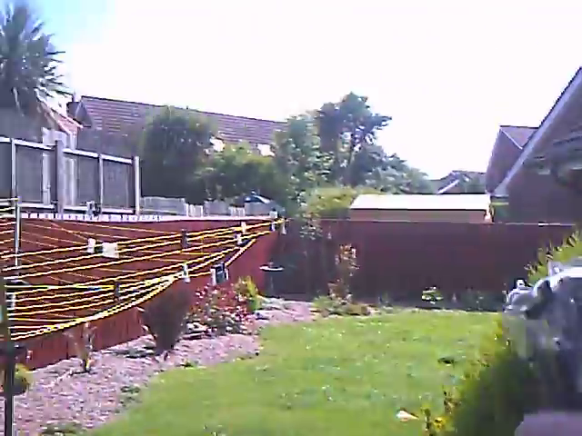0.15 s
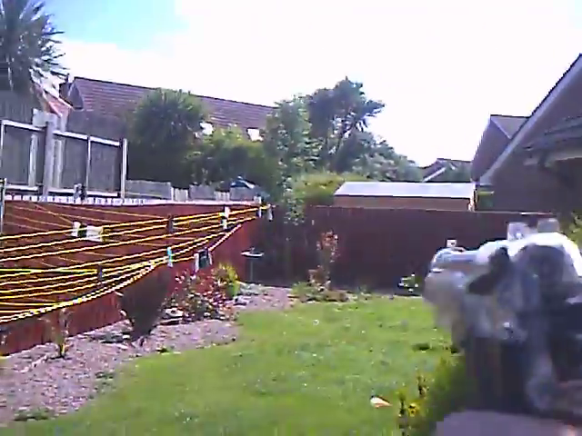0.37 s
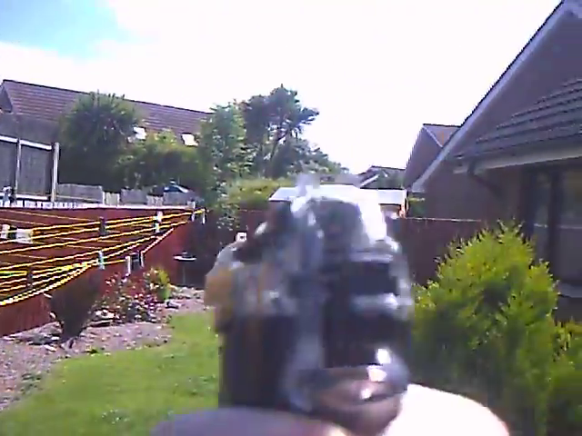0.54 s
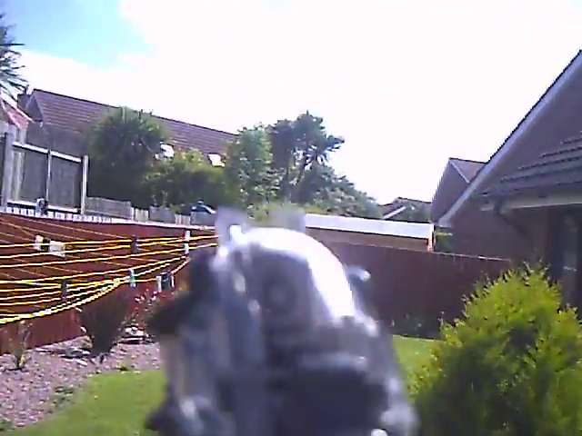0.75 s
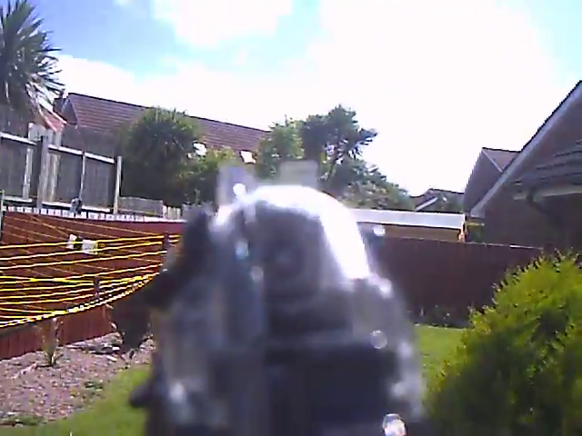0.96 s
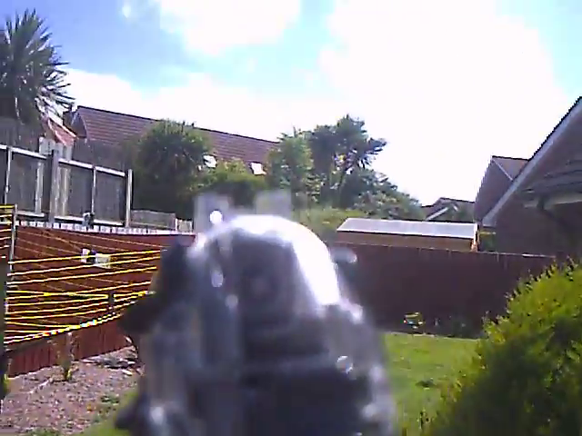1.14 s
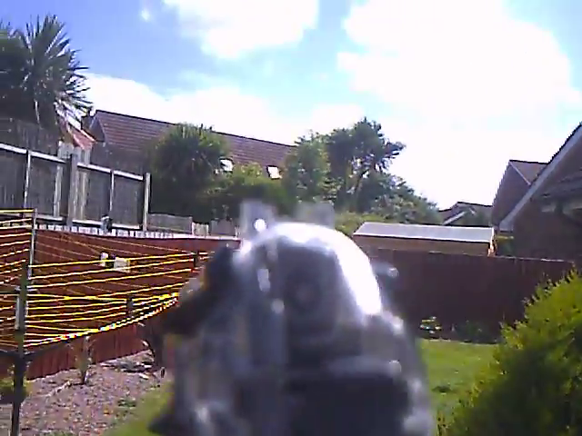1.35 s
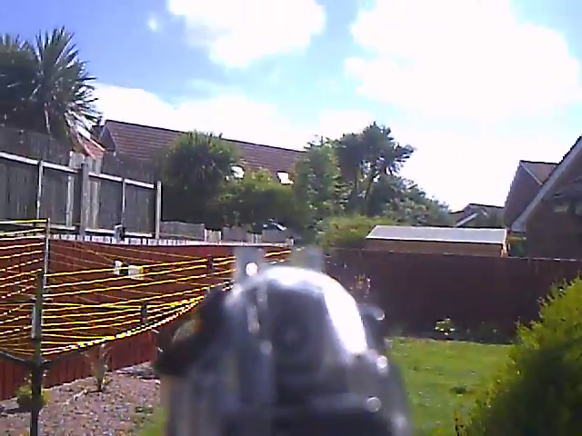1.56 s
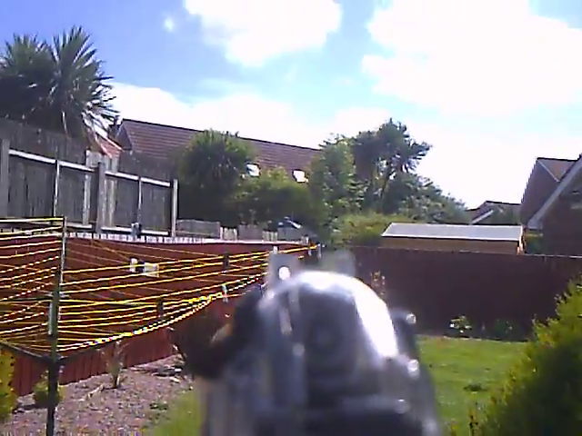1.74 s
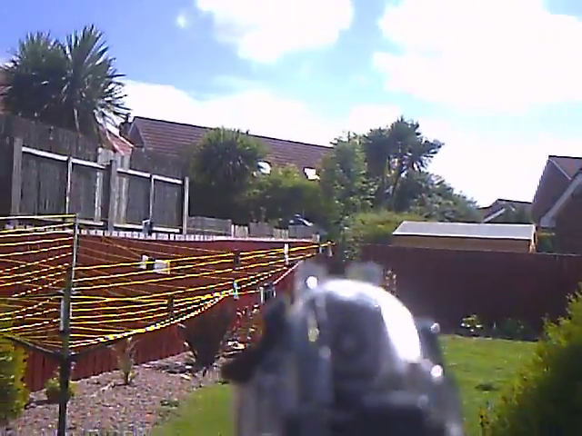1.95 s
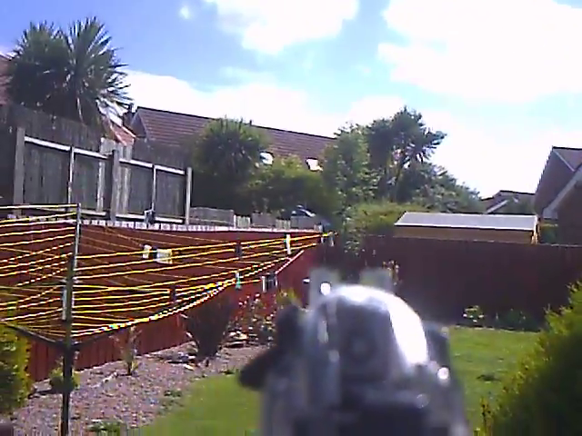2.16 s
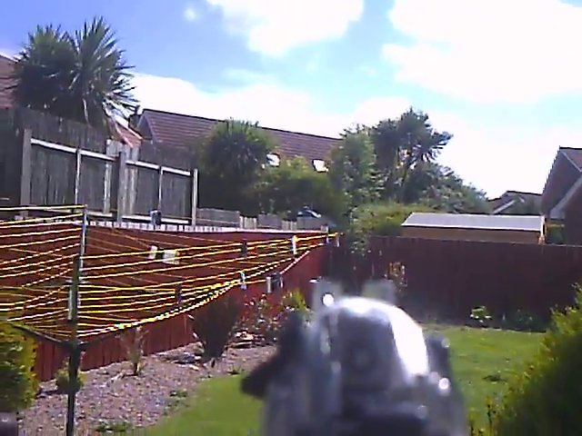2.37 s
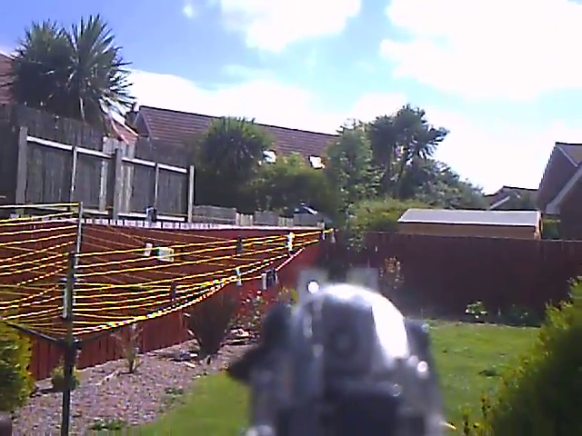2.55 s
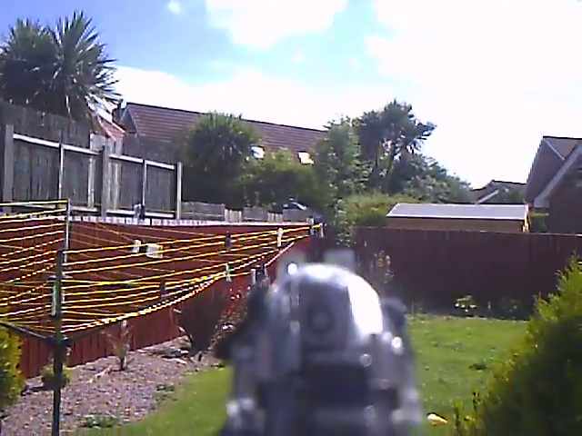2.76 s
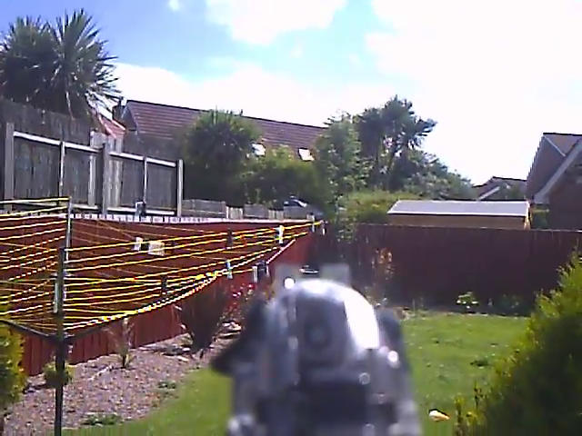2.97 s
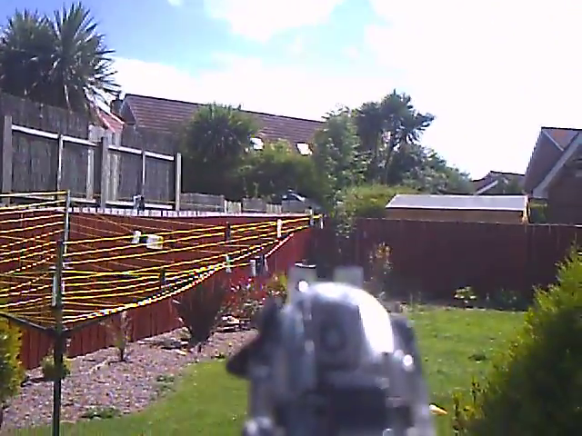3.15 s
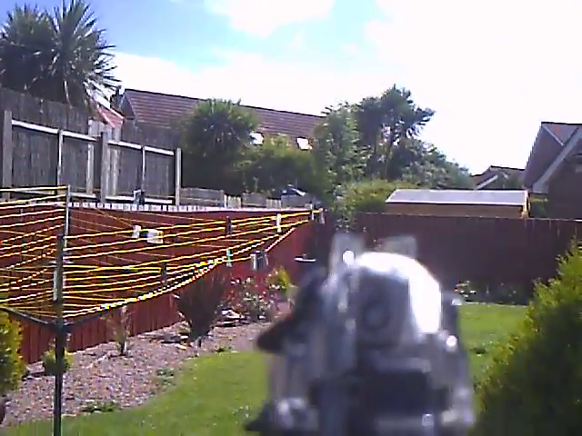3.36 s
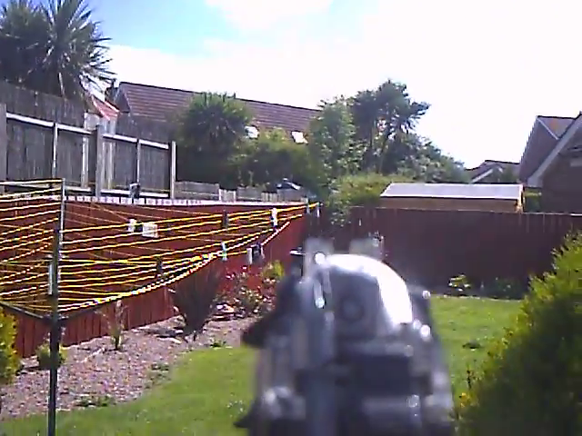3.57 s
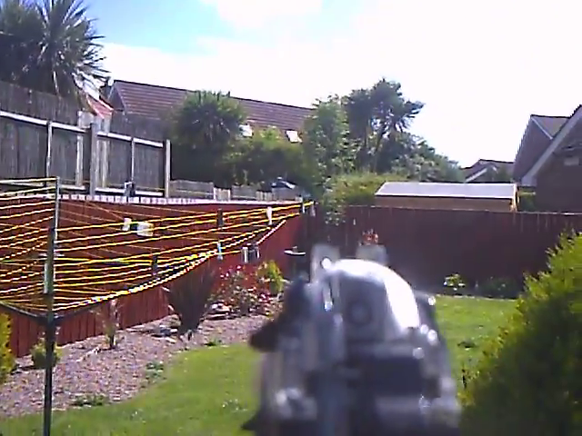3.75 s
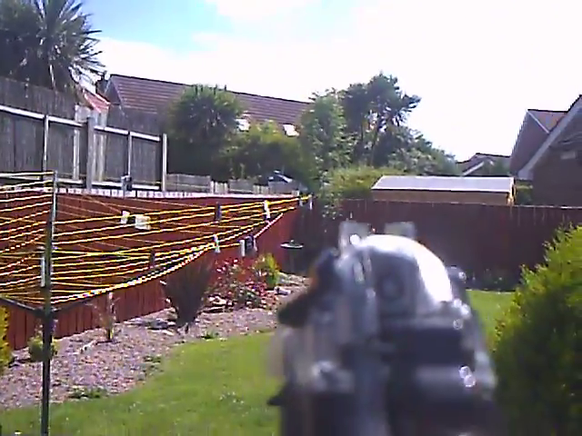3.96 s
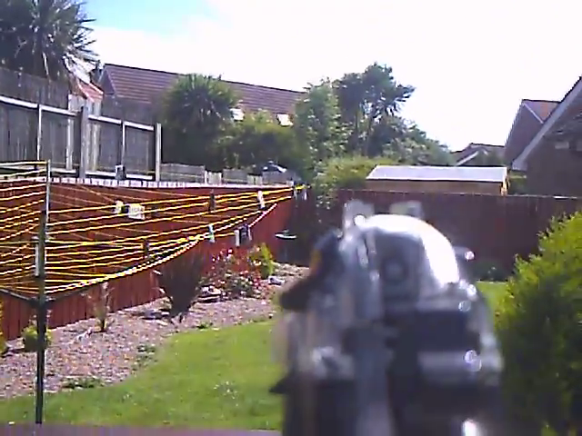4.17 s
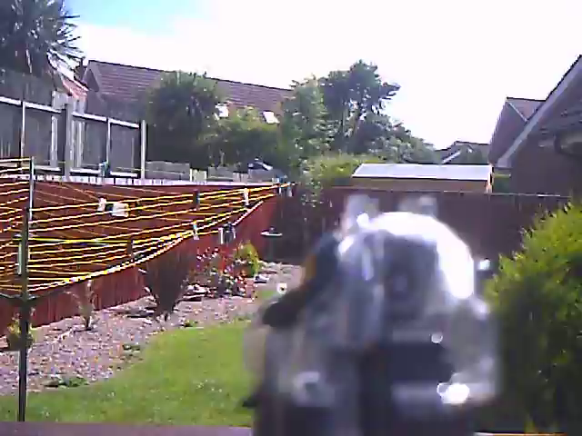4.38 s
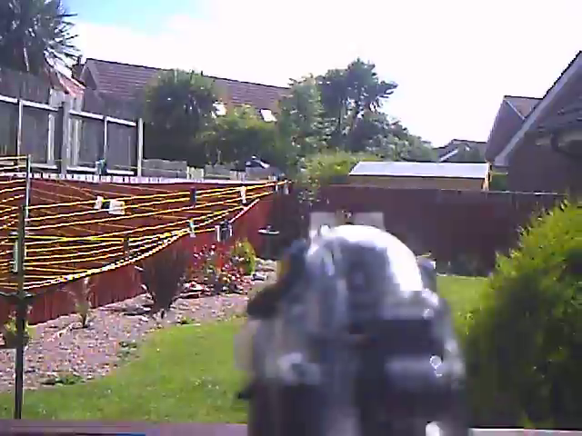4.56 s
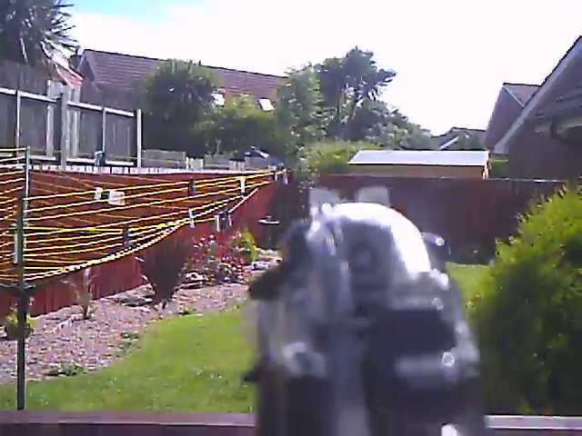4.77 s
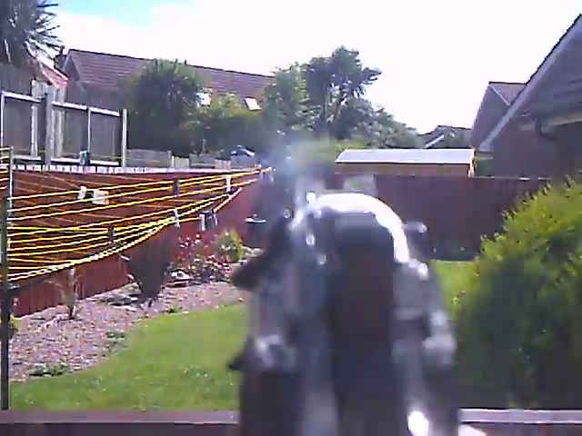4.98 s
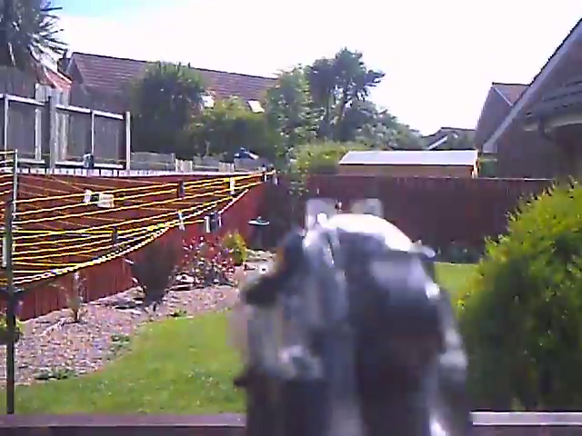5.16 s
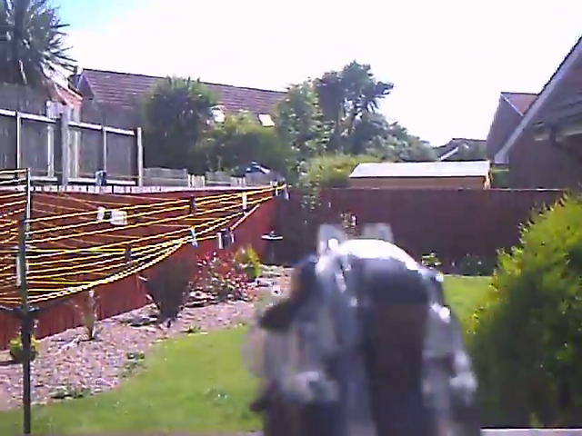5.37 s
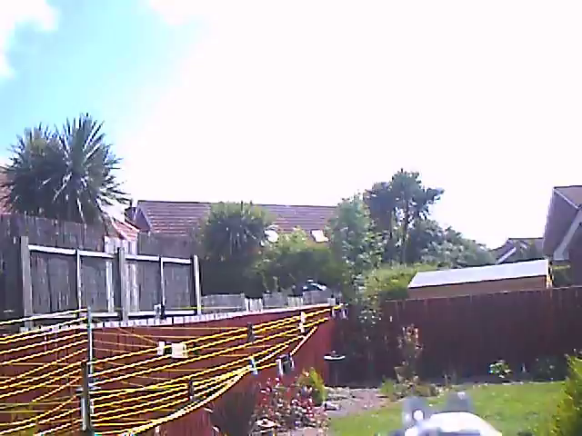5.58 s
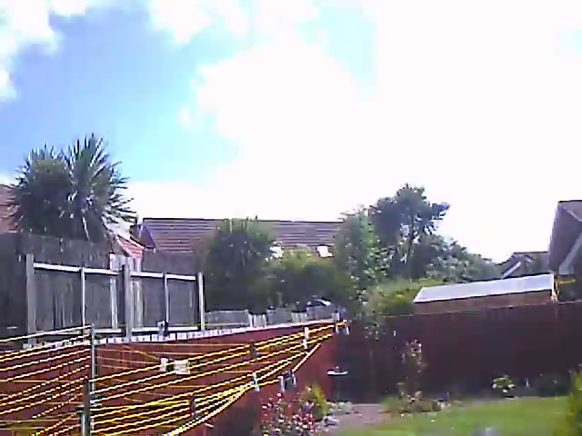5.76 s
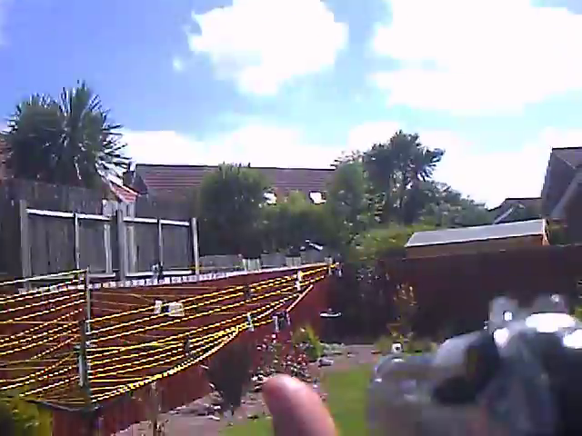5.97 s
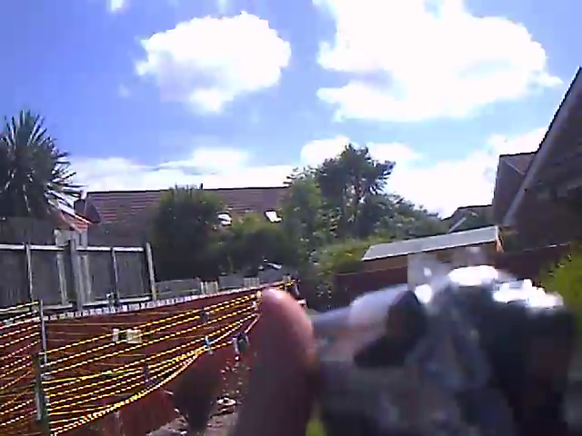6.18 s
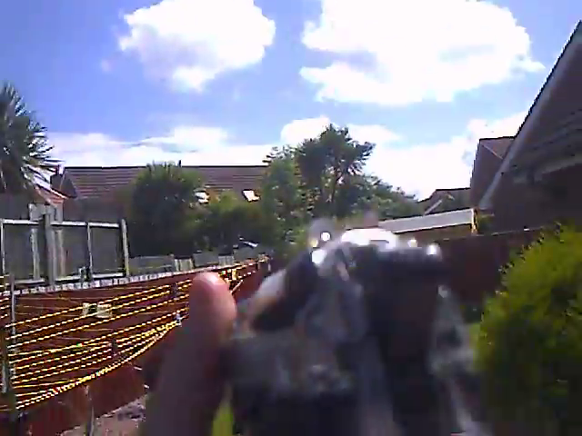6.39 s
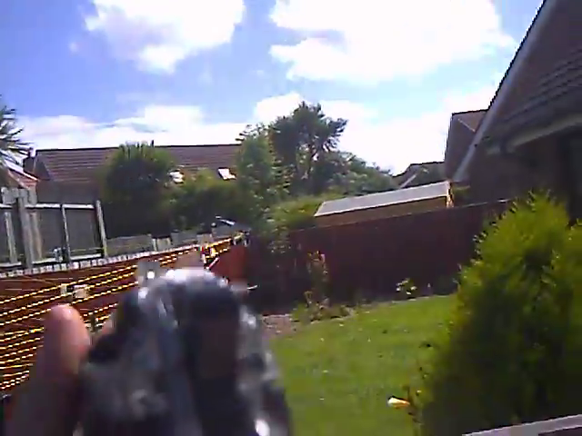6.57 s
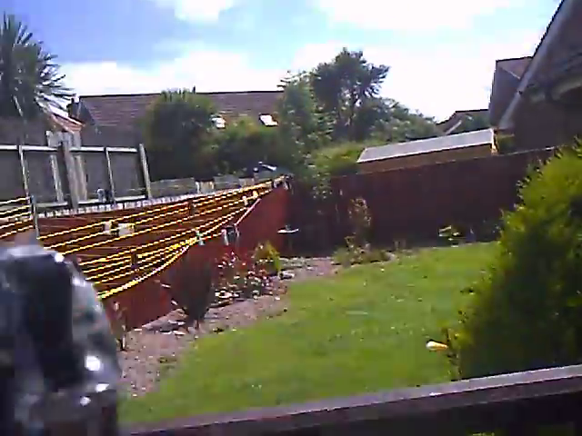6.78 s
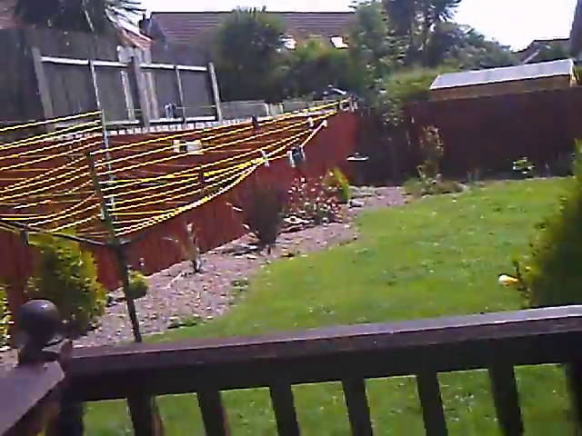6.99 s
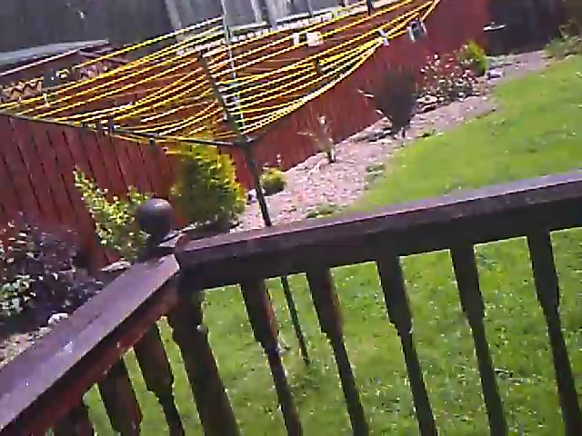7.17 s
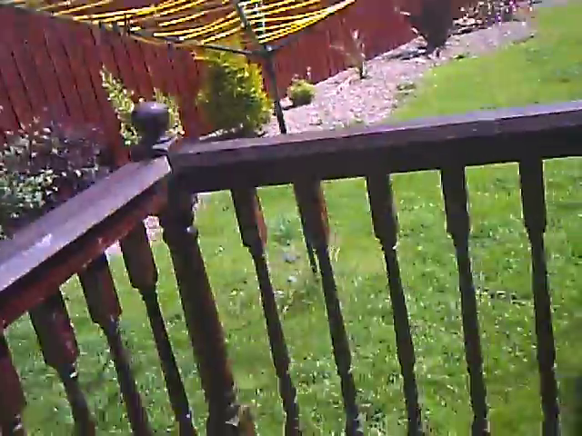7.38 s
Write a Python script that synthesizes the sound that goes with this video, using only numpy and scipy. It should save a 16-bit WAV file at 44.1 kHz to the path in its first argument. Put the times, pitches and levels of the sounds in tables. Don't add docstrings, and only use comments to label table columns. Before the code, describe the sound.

Outdoors in a garden, a small crude camera microphone picks up bumps and creaking of its plastic housing, a pause with barely any faint background, then eight close gas pistol shots. Each one is a distorted puff and thump with the slide ringing back and slamming home. The pace quickens, then slackens as gas runs low. Pellets tap distant boards; knocks and creaks finish.

```python
import sys
import numpy as np
from scipy import signal
from scipy.io import wavfile
from scipy.ndimage import uniform_filter1d

SR = 44100
rng = np.random.default_rng(int(sys.argv[2]) if len(sys.argv) > 2 else 0)


def magnitude_from_level(level_db):
    exponent = np.asarray(level_db, float) / 20
    return 10 ** exponent


def transcribe(u):
    v = np.clip(np.atleast_2d(u).T, -1, 1)
    q = np.round(v * 32767).astype(np.int16)
    wavfile.write(sys.argv[1], SR, q)


N = 327663

# (time [s], level [dB], fade over the blast [dB], vent thump delay [ms], thump level [dB])
BLASTS = [
    (3.3592, 0, 5, 18.5, 0),
    (4.1085, -1, 3, 19.5, 0),
    (4.5105, -3, 4, 17, 1),
    (4.7808, -2, 6, 18.2, 0),
    (5.0265, -2, 8, 19, 1),
    (5.2495, -2, 9, 21, 1),
    (5.7655, -3, 4, 21.5, -8),
    (6.3262, -4, 6, 23, -10),
]
# (time [s], peak [dB], ring [Hz], bounce [dB], clatter share [0-1])
STOPS = [
    (3.3879, -5, 4400, -1, .8),
    (4.137, 2, 4350, -6, .4),
    (4.5358, 2, 4350, -1, .3),
    (4.8078, 2, 4350, -6, .3),
    (5.0553, 2, 4400, -4, .25),
    (5.2803, 2, 4400, -5, .25),
    (5.797, 0, 4550, -8, .4),
    (6.358, -4, 4700, -11, .6),
]
# (time [s], peak [dB], bounce [dB], scrape before it [dB])
SLAMS = [
    (3.4199, -5, -5, -23),
    (4.1672, -3.5, -9, -17),
    (4.571, -4, -7.5, -17),
    (4.841, -3.5, -2, -20),
    (5.084, -8.5, -0.5, -16.5),
    (5.3077, -2, -6, -13),
    (5.82, -4, -8, -11),
    (6.3777, -6, -7, -11.5),
]
# (time [s], level [dB], board [Hz], bright tick [dB])
PELLETS = [(3.53, -28.5, 1010, 5), (4.252, -31.5, 1620, 7.5), (4.608, -34, 1740, 11.5),
           (4.874, -36.5, 1740, 13), (5.329, -56, 1750, 11), (5.361, -40.5, 1580, 20),
           (5.613, -27.5, 916, -3.5), (5.914, -29, 994, 5.5), (5.953, -31, 864, 5), (6.481, -29, 990, 6),
           (6.527, -31, 600, 4)]
# (time [s], level [dB], body [Hz], length [ms])
KNOCKS = [(0.01, -33, 1000, 15), (0.025, -29, 875, 8.8), (0.361, -28, 1200, 9.7), (0.114, -31, 920, 26),
          (0.28, -24.5, 1300, 6.4), (0.322, -35, 1680, 7.6), (0.394, -23.5, 1210, 31),
          (0.41, -21, 1200, 14), (0.419, -26, 1550, 8.3), (0.825, -14.5, 1420, 8.9),
          (0.84, -14.5, 1210, 14), (0.86, -20, 1560, 22), (1.108, -29.5, 886, 21), (3.687, -36, 1040, 4.1),
          (6.021, -28, 1034, 8.9), (6.121, -21.5, 1245, 7.4), (6.139, -31, 1120, 8.8),
          (6.191, -14.5, 1400, 7.1), (6.219, -24, 1220, 8.8), (6.23, -20, 1200, 28),
          (6.247, -19.5, 1290, 14), (6.259, -23, 1250, 12), (6.499, -22, 1130, 3.2),
          (6.674, -21, 1030, 5.3), (6.704, -22.5, 1220, 9.6), (6.833, -27.5, 1280, 15),
          (7.128, -30.5, 602, 19), (7.369, -19.5, 1190, 15), (7.382, -22.5, 1370, 24), (7.424, -27, 980, 8)]
# (time [s], signed pressure peak [full scale])
SLIPS = [(0.1728, -0.16), (0.3078, -0.14), (0.3127, -0.14), (0.3588, -0.06), (0.3921, 0.17), (0.3954, 0.29),
         (0.3995, 0.13), (0.4283, -0.05), (0.4336, -0.47), (0.8345, 0.16), (0.8368, 0.24), (0.8404, -0.15),
         (0.8446, -0.37), (0.849, -0.26), (0.8676, -0.31), (0.8807, -0.17), (5.447, -0.13), (6.1832, 0.27),
         (6.1852, 0.39), (6.1916, 0.12), (6.194, 0.22), (6.196, -0.28), (6.198, -0.18), (6.2068, -0.13),
         (6.2436, -0.27), (6.2559, -0.11), (6.5101, 0.06), (6.6161, -0.22)]
# (start [s], first gap [ms], gap ratio [1], first peak [full scale], slips [count])
CREAKS = [
    (.1305, 15, .86, -.32, 7),
    (.4679, 7.2, .54, -.2, 3),
    (.8845, 8.6, .88, -.32, 5),
    (5.4799, 12.4, .76, -.09, 5),
    (5.6527, 19, .37, -.08, 3),
    (5.867, 16, .72, -.09, 5),
    (6.2667, 2.2, 1.16, -.17, 7),
    (6.6317, 8.2, .88, -.17, 10),
]
# (start [s], hold [s], rumble [dB], rustle against rumble [dB])
MOVES = [(.001, 0.023, -50.5, 9), (0.117, 0.055, -33.5, -9.5), (0.287, 0.036, -41.5, -4.5),
         (0.391, 0.087, -34, -8.5), (0.59, 0.076, -50.5, -4.5), (0.836, 0.047, -33, -6),
         (1.106, 0.017, -45, -6.5), (3.684, 0.017, -52, -16), (3.886, 0.028, -52.5, -8),
         (4.282, .04, -46, -17), (5.473, 0.02, -49.5, -9), (5.86, 0.023, -51, 2.5), (6.08, 0.059, -46, 1),
         (6.183, 0.068, -35.5, -4.5), (6.494, 0.027, -43.5, -5.5), (6.618, 0.058, -39, -8.5),
         (6.818, 0.09, -51, -8), (7.046, 0.046, -53.5, -6.5), (7.36, .07, -51.5, -2)]
TRIGGER_DB = [-31.5, -21.5, -21, -27, -25, -29, -6.5, -7]
# (frequency [Hz], t60 [s])
GARDEN = [(100, 0.75), (500, 0.36), (1500, 0.39), (4000, 0.43), (10000, 0.16)]
# (frequency [Hz], level [dB], t60 [s])
THUD = [(500, -13.5, .026), (1030, -13, .022), (1600, -18, .012), (2600, -22, .006)]

# (frequency [Hz], width [Hz], level [dB])
GAS_BODY = [(200, 220, -2.5), (452, 146, 3.5), (764, 595, 1), (1133, 87, -9), (1826, 490, 2),
            (2880, 1700, -12), (4240, 300, -0.5)]
GAS_HISS = [(6400, 210, -7), (7240, 510, -9), (8800, 1500, -16)]
STOP_BODY = [(735, 2000, 13), (1620, 900, 15.5), (2940, 170, -30), (6650, 700, -61), (7260, 700, 3),
             (9000, 3700, -20)]
SLAM_BODY = [(500, 240, -3.5), (1130, 353, 11.5), (1760, 500, 8), (2577, 300, 0), (4144, 350, 3),
             (7040, 630, -8.5), (8860, 2500, -18)]
SCRAPE_BODY = [(4440, 350, 2.5), (2600, 900, -4.5), (1300, 1400, -7), (7000, 2000, -18.5)]
TICK_BODY = [(3680, 570, -16), (4520, 2500, 11.5), (6050, 520, 8), (8900, 660, 9)]
SCATTER = [(477, 970, -3.5), (1200, 1300, 5.5), (2580, 2700, -6.5), (4490, 1800, -13), (6940, 11000, -13.5)]
SNAP_BODY = [(4150, 900, 4), (5540, 900, -7)]
FADING = [(990, 240, 6), (1890, 600, -7), (2450, 250, -14.5), (3200, 250, -12)]
TRAFFIC = [(57.3, 96, 3), (193, 290, -6), (903, 430, 1), (1508, 540, -9.5), (2570, 1500, -15.5),
           (8550, 12000, -19.5)]

STOP_BOUNCE_MS, SLAM_BOUNCE_MS, SLAM_LAST_DB = 7.2, 5.3, -13
TRIGGER_LEAD_S, TRIGGER_HZ, TRIGGER_MS = .009, 1090, 12
KNOCK_BRIGHT_DB = -16.5
CREAK_END = -.032
SNAP_S, SNAP_DB, THUD_S = .279, -30, .9343
RISE_DB_PER_S, FALL_DB_PER_S = 599, 300.5
GARDEN_DB, TRAFFIC_DB, RIPPLE_DB = -19.5, -51.5, -65
STEP, REST = 2 ** -7.5, -20


def evened(x):
    return x / np.sqrt(np.mean(x ** 2) + 1e-20)


def add(mix, s, sound):
    part = mix[round(s * SR):][:len(sound)]
    part += sound[:len(part)]


def ring(x, modes):
    out = 0
    for hz, width, db in modes:
        peak = signal.iirpeak(hz, hz / (1.5 * width), SR)
        once = signal.lfilter(*peak, x)
        out = out + magnitude_from_level(db) * signal.lfilter(*peak, once)
    return out


def burst(rise_ms, decay_ms, modes, size=1800):
    ms = np.arange(size) * 1000 / SR
    envelope = (1 - np.exp(-ms / rise_ms)) * np.exp(-ms / decay_ms)
    y = ring(rng.standard_normal(size) * envelope, modes)
    return y / abs(y).max()


def pistol():
    out = np.zeros(N)
    for s, *row in BLASTS:
        add(out, s - .0012, magnitude_from_level(-28) * burst(.1, .6, TICK_BODY))
        add(out, s, blast(*row))
    for s, *row in STOPS:
        add(out, s, stop(*row))
    for s, *row in SLAMS:
        add(out, s - .006, slam(*row))
    return signal.lfilter(*signal.butter(2, 70, "high", fs=SR), out)


def blast(db, fade_db, thump_ms, thump_db):
    ms = np.arange(2600) * 1000 / SR
    sputter_db = 3.6 * evened(uniform_filter1d(rng.standard_normal(len(ms)), 70))
    opening = 1 - np.exp(-(ms / 1.63) ** 2)
    shut = 1 / (1 + np.exp((ms - thump_ms - 5.5) / 2.2))
    flow = opening * magnitude_from_level(sputter_db - fade_db * ms / thump_ms) * shut
    jet = rng.standard_normal(len(ms))
    hiss = magnitude_from_level(-9) * evened(ring(jet, GAS_HISS)) * np.exp(-ms / 12)
    gas = magnitude_from_level(db - 2.5) * (evened(ring(jet, GAS_BODY)) + hiss) * flow
    push = -.55 * ms / 1.2 * np.exp(1 - ms / 1.16) * np.cos(ms * 0.83)
    late = np.maximum(ms - thump_ms, 0)
    swing = np.sin(2 * np.pi * .68 * late * (1 - .04 * late))
    thump = -1.4 * magnitude_from_level(thump_db) * swing * np.exp(-(late / 2.5) ** 1.5)
    return gas + push + thump


def stop(db, hz, bounce_db, clatter):
    out = np.zeros(2400)
    ms = np.arange(900) * 1000 / SR
    for late_ms, blow_db in ((0, db), (STOP_BOUNCE_MS, bounce_db - 3)):
        waver = .5 * evened(uniform_filter1d(rng.standard_normal(len(ms)), 40))
        envelope = (1 - np.exp(-ms / .4)) * np.exp(-(ms / 2.6) ** 2.4)
        metal = np.sin(2 * np.pi * hz * ms / 1000 + waver) * envelope
        add(out, late_ms / 1000, 1.5 * magnitude_from_level(blow_db) * metal)
        add(out, late_ms / 1000, magnitude_from_level(blow_db) * clatter * burst(0.043, 6.6, STOP_BODY))
    return out


def slam(db, bounce_db, scrape_db):
    out = np.zeros(3000)
    add(out, 0, magnitude_from_level(scrape_db) * burst(.3, 8.3, SCRAPE_BODY))
    add(out, .0058, magnitude_from_level(db - 2.5) * burst(.4, 0.85, SCRAPE_BODY))
    for k, blow_db in enumerate((db + 1.0, bounce_db - 0.5, SLAM_LAST_DB - 1.0)):
        add(out, 0.0058 + k * SLAM_BOUNCE_MS / 1000, magnitude_from_level(blow_db) * burst(0.5, 2.28, SLAM_BODY))
    return out


def pellets():
    out = np.zeros(N)
    for s, db, hz, tick_db in PELLETS:
        board = burst(1.0, 8.7, [(hz, 350, 0), (hz * 1.8, 500, -5)])
        tick = magnitude_from_level(tick_db - 6.5) * burst(0.21, 3.6, TICK_BODY)
        add(out, s, magnitude_from_level(db + 3.0) * (board + tick))
    return out


def housing():
    out = np.zeros(N)
    pulls = [(row[0] - TRIGGER_LEAD_S, db, TRIGGER_HZ, TRIGGER_MS) for row, db in zip(BLASTS, TRIGGER_DB)]
    for s, db, hz, ms in KNOCKS + pulls:
        shell = burst(ms / 12, ms / 3, [(hz, 220, 0), (450, 250, -14), (2000, 500, -13)])
        bright = burst(0.041, ms / 4, [(3050, 600, -2.5), (4410, 900, -5.5)])
        add(out, s, magnitude_from_level(db - 3.5) * (shell + magnitude_from_level(KNOCK_BRIGHT_DB) * bright))
    creaking = [one for row in CREAKS for one in creak(*row)]
    for s, peak in SLIPS + creaking:
        add(out, s - .0005, peak * slip())
    add(out, SNAP_S, magnitude_from_level(SNAP_DB) * burst(.3, 2.5, SNAP_BODY))
    add(out, THUD_S, thud())
    return out


def creak(s, gap_ms, ratio, peak, count):
    k = np.arange(count)
    gaps_ms = gap_ms * ratio ** (k - 1.) * (k > 0)
    return list(zip(s + np.cumsum(gaps_ms) / 1000, np.geomspace(peak, CREAK_END, count)))


def slip():
    ms = np.arange(600) * 1000 / SR - .5
    jerk = 1.15 * np.exp(-(ms / .16) ** 2) - .25 * np.exp(-((ms - .35) / .16) ** 2)
    after = ms > .2
    wobble = burst(0.36, 2.5, [(1300, 1200, 2.0), (1790, 200, -17)], size=600) * after
    sag = -.08 * after * np.exp(-ms / 21.0)
    return jerk + 0.19 * wobble + sag


def thud():
    t = np.arange(3000) / SR
    out = np.zeros(len(t))
    for hz, db, t60 in THUD:
        out -= magnitude_from_level(db - 60 * t / t60) * np.cos(2 * np.pi * hz * (t - .0025))
    return out * (1 - np.exp(-t / .0006))


def earlier_knock():
    out = np.zeros(N)
    add(out, 0, magnitude_from_level(-25.0) * burst(0.41, 54.0, FADING, size=8000))
    return out


def hand():
    t = np.arange(N) / SR
    low, grit, grain = rng.standard_normal((3, N))
    rumble = evened(ring(low, [(50.95, 68, 4.5), (145.3, 150, -2.0), (338, 250, -9.5)]))
    grit = grit * magnitude_from_level(4.0 * evened(uniform_filter1d(grain, 130)))
    rustle = evened(ring(grit, [(1200, 640, 29.0), (2000, 590, -12.0)]))
    out = np.zeros(N)
    for s, hold, db, rustle_db in MOVES:
        near = slice(max(round((s - .12) * SR), 0), round((s + hold + .3) * SR))
        early, late = np.maximum(s - t[near], 0), np.maximum(t[near] - s - hold, 0)
        loss_db = RISE_DB_PER_S * early + FALL_DB_PER_S * late
        out[near] += magnitude_from_level(db - loss_db) * (rumble[near] + magnitude_from_level(rustle_db) * rustle[near])
    return out


def garden(x):
    strength = np.sqrt(abs(uniform_filter1d(np.clip(x, -.7, .7) ** 2, 60)))
    sent = strength * evened(ring(rng.standard_normal(N), SCATTER))
    hz, t, z = signal.stft(rng.standard_normal(SR // 2), SR, nperseg=256)
    f, t60 = np.transpose(GARDEN)
    band_t60 = np.interp(np.log(hz + 1), np.log(f), t60)[:, None]
    tail = signal.istft(z * magnitude_from_level(-60 * t / band_t60), SR, nperseg=256)[1]
    way = np.zeros(300)
    return signal.fftconvolve(sent, np.r_[way, tail / np.linalg.norm(tail)])[:N]


def traffic():
    swell_db = 2.0 * evened(uniform_filter1d(rng.standard_normal(N), 500))
    return magnitude_from_level(TRAFFIC_DB + swell_db) * evened(ring(rng.standard_normal(N), TRAFFIC))


def scene():
    shots = pistol()
    close = shots + housing() + earlier_knock() + hand()
    far = pellets() + magnitude_from_level(GARDEN_DB) * garden(shots) + traffic()
    return (close + far)[None]


def top_cut(x):
    return signal.sosfilt(signal.butter(12, 16500, fs=SR, output="sos"), x)


def record(dry):
    slow = signal.resample_poly(np.clip(dry[0], -.61, .61), 80, 147)
    level = slow / STEP
    level = np.where(level > 0, np.maximum(level - 1.3, 0), level - .15)
    edges = [0, 11700, 12400, 13100, 13600, 12000 * 147]
    gains = magnitude_from_level(np.array([0, 0, -5, -24, -70, -120]))
    smooth = signal.firwin2(147 * 48 + 1, edges, gains, fs=24000 * 147)
    out = signal.resample_poly(np.round(level) * STEP, 147, 80, window=smooth)[:N]
    out = np.pad(out, (0, N - len(out)))
    out = np.clip(out + REST * STEP, -.715, .76)
    out = signal.oaconvolve(out, signal.firwin(255, 16100, window=("kaiser", 9), fs=SR), "same")
    ripple = magnitude_from_level(RIPPLE_DB) * evened(ring(rng.standard_normal(N), [(40, 91, 23.0), (86, 81, -3.5)]))
    return top_cut((out + ripple)[None])


dry = scene()
out = record(dry)
transcribe(out)
```